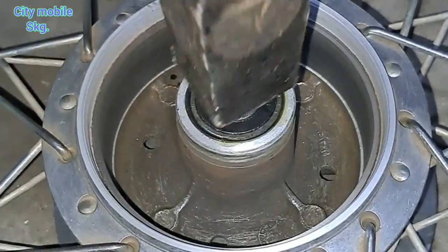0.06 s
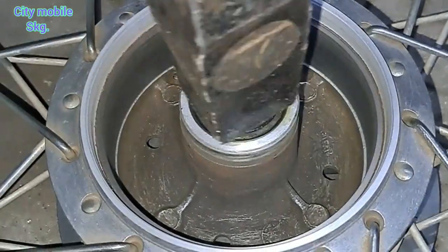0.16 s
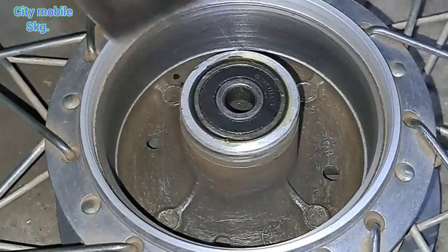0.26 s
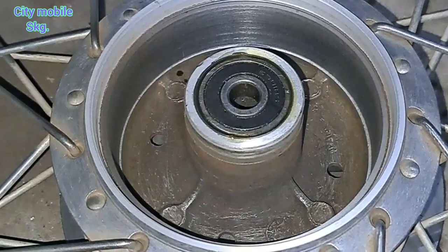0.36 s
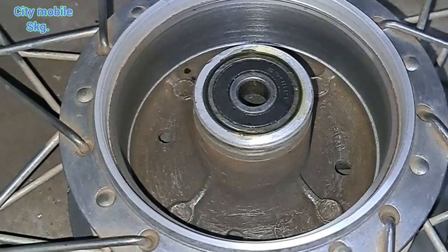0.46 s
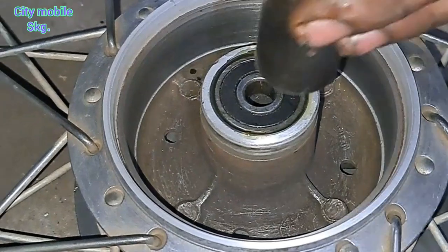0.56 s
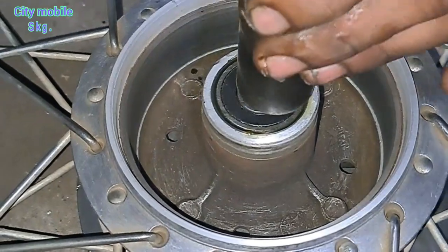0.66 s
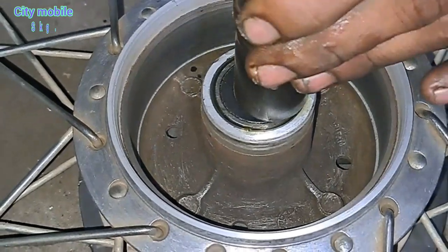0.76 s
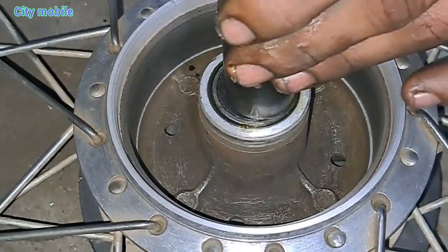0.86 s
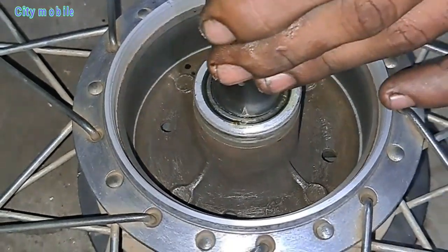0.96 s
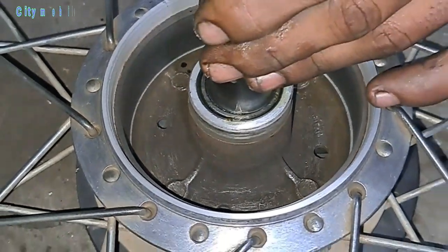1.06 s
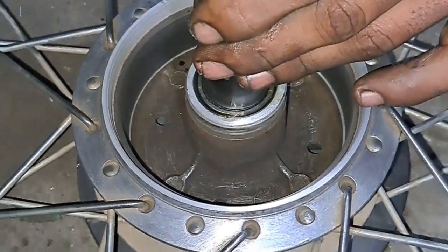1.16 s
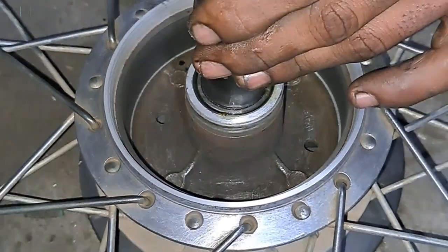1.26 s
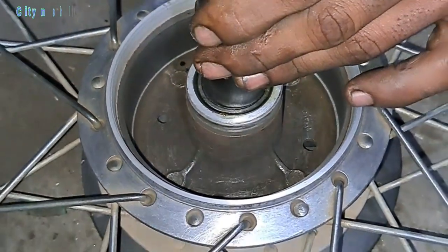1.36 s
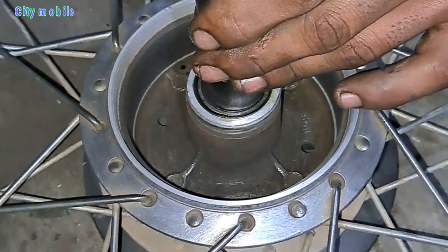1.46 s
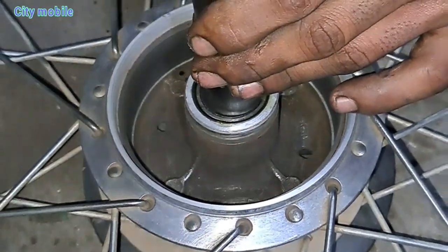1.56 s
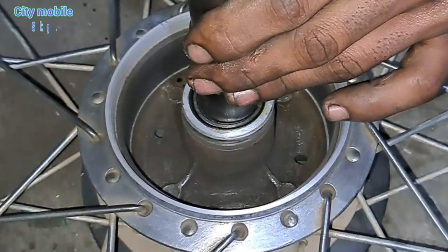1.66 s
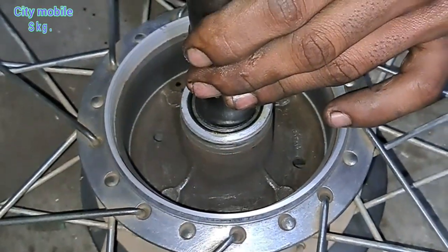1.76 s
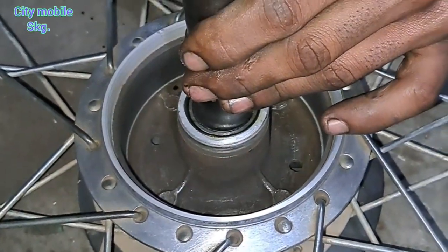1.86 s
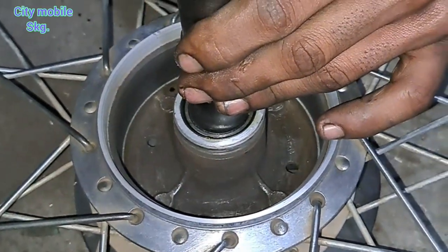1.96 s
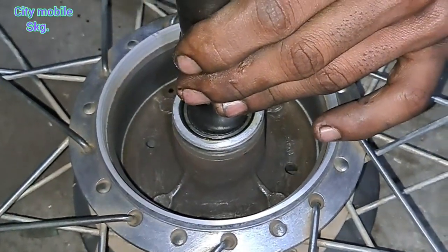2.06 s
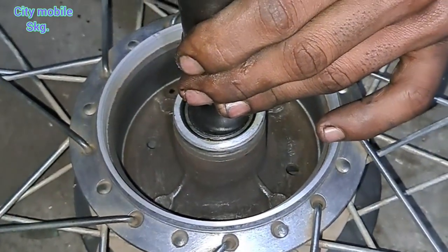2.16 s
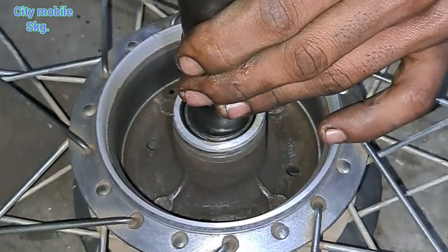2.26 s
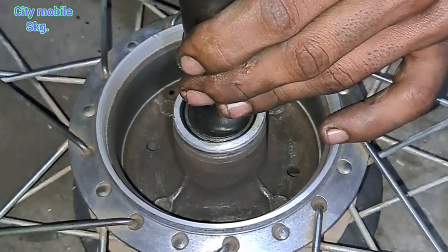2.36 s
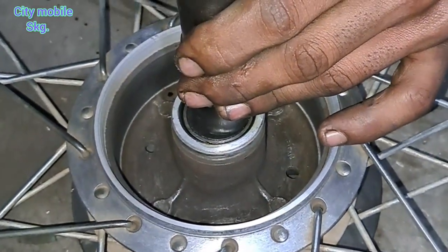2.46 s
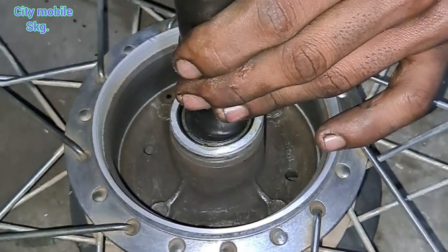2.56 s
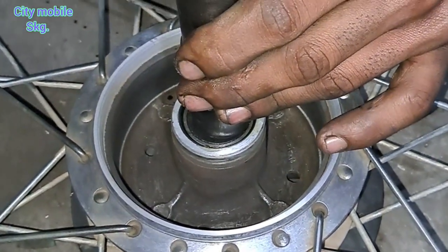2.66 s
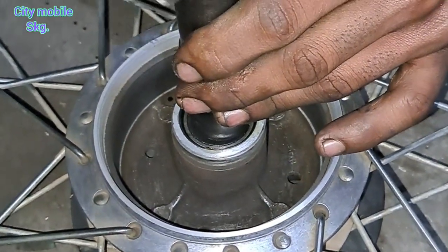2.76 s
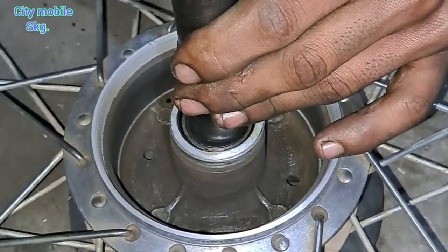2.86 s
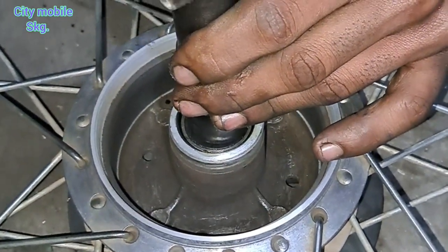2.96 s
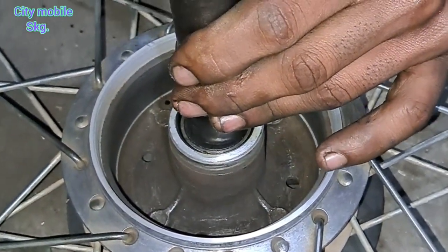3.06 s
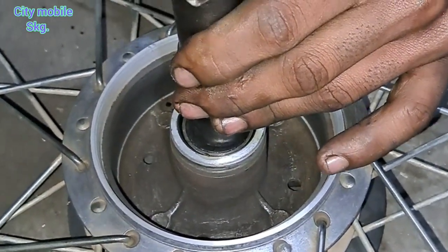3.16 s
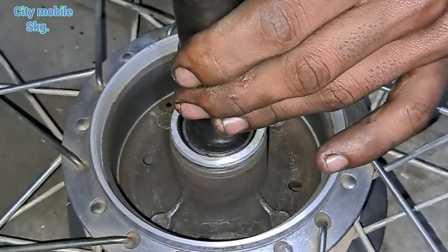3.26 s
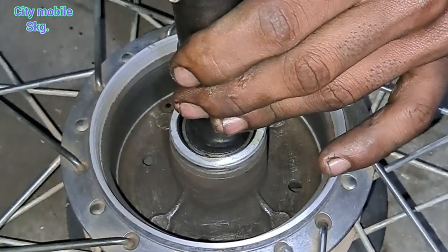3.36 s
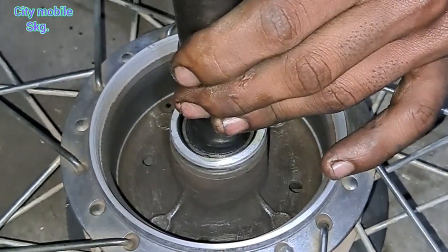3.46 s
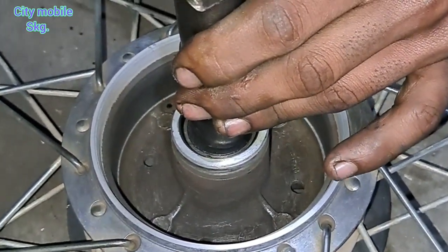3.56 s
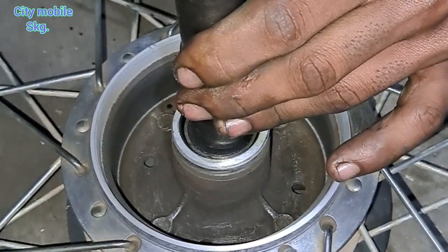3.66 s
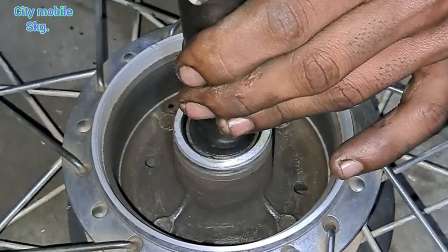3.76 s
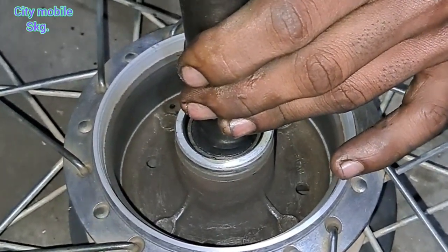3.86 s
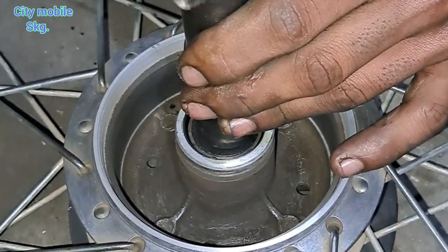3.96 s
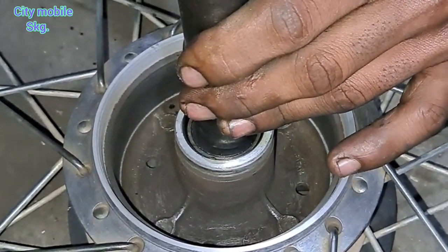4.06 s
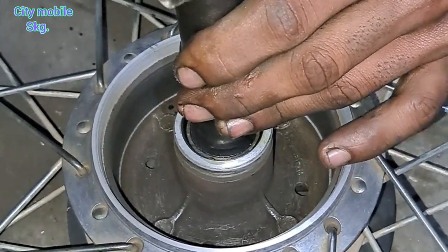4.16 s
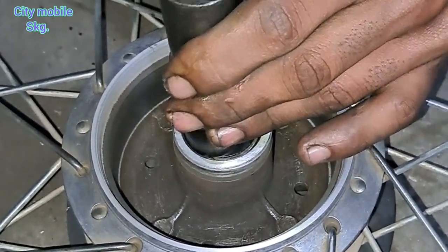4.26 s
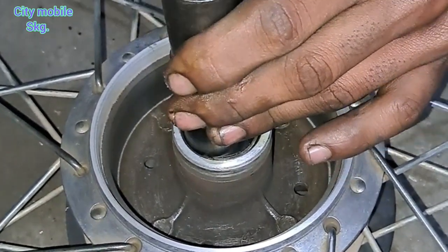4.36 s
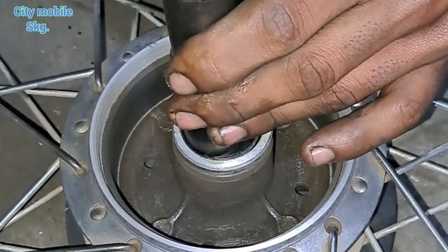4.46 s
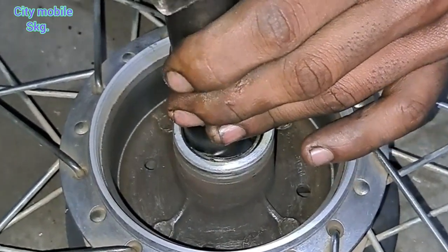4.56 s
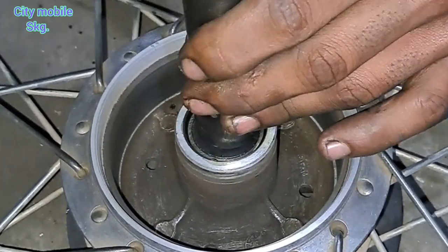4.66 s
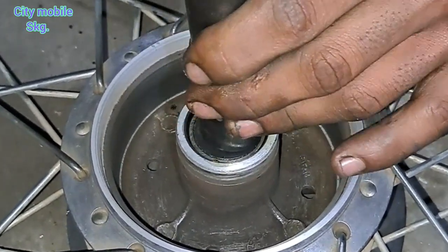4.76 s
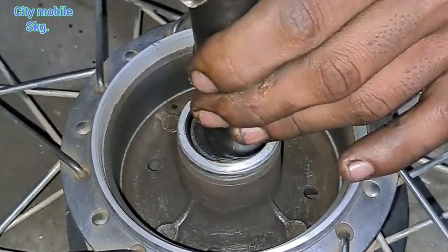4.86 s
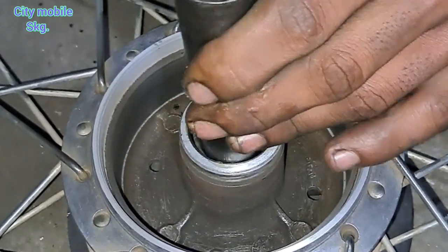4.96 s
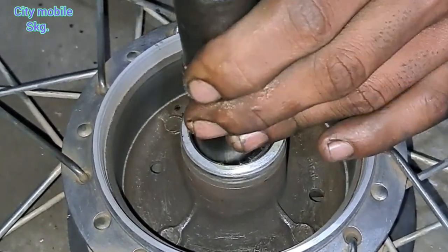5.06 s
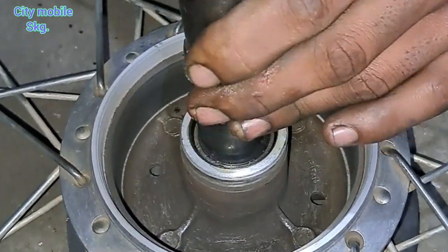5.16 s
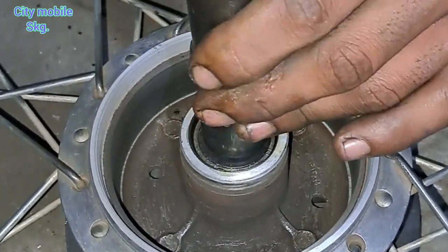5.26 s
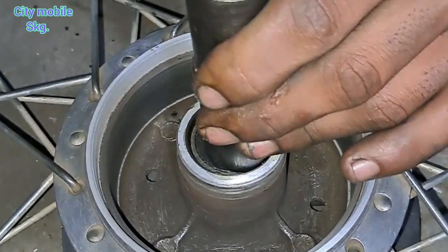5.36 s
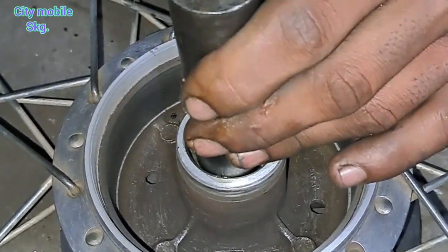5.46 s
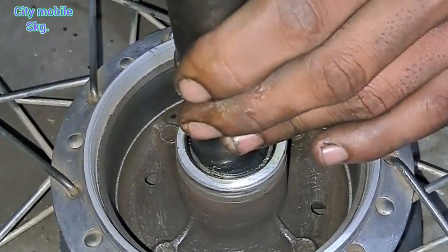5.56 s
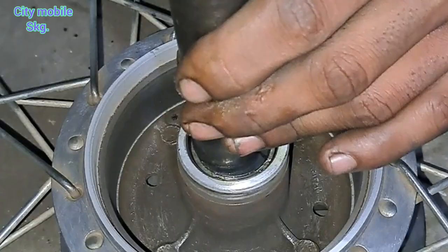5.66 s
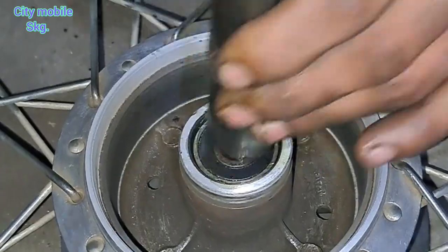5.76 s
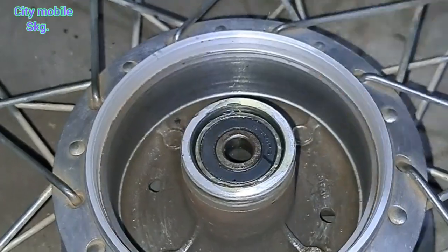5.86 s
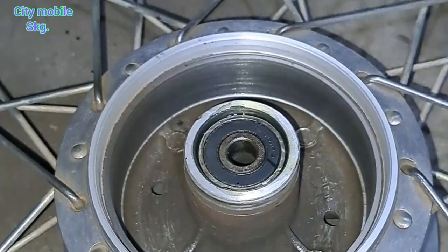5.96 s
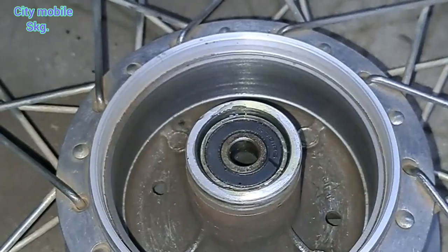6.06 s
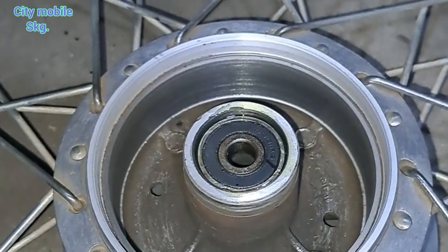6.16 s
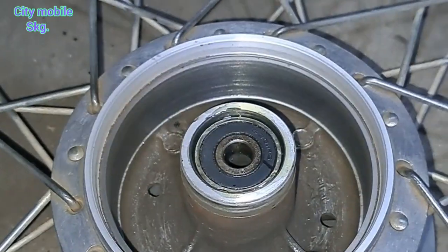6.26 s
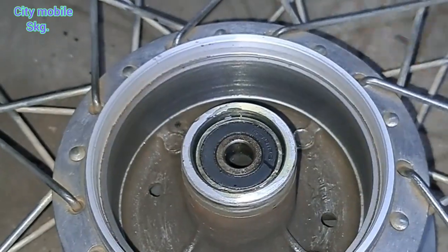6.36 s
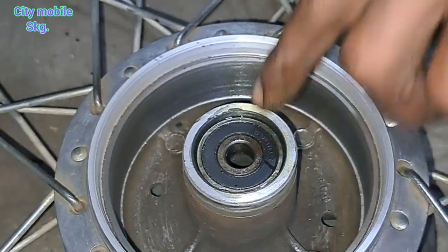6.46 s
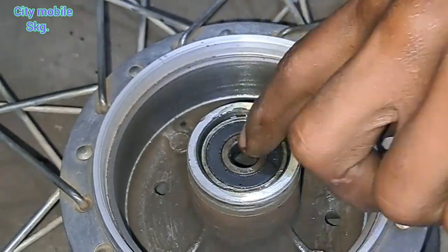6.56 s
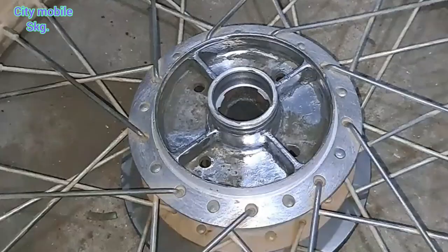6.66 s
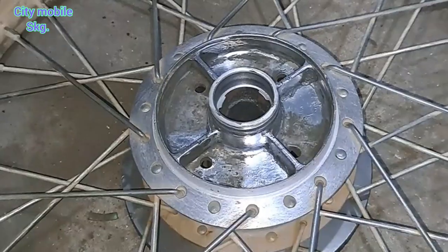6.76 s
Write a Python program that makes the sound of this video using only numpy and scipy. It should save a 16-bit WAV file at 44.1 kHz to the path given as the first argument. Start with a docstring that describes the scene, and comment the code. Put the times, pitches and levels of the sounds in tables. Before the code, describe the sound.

Close stereo view of a hard workshop: two heavy, dull hammer blows, a pause with a light clink as a steel drift is set down, then a run of sharp, ringing metal cracks about five a second, slowing near the end. A few light tool knocks follow over street rumble and engine drone, which swells at the close.

```python
"""A steel hammer drives a bearing into a spoked wheel hub: two duller blows with more thud, then brighter ones.
Cracks are coloured noise bursts with echoes and a hard-walled workshop's tail; steel rings as decaying sines.
Lesser contacts crack close to some blows, a drift clinks, low bumps of air sound and tools knock lightly.
Behind: street rumble, engine drone, wash and hiss of shaped noise, a faint whine and one thin, distant squeal."""
import sys
import numpy as np
from scipy import signal
from scipy.fft import rfft, irfft
from scipy.io import wavfile
from scipy.ndimage import uniform_filter1d

SR = 44100
rng = np.random.default_rng(int(sys.argv[2]) if len(sys.argv) > 2 else 0)


def unload_audio(sound):
    """Save the sound as a 16-bit wav file, at the path given as the first command line argument."""
    columns = np.transpose(np.atleast_2d(sound))
    # keep every value between -1 and 1, then stretch to whole-number steps
    steps = np.round(np.clip(columns, -1, 1) * 32767)
    wavfile.write(sys.argv[1], SR, steps.astype(np.int16))


N = 299880
T = np.arange(int(.6 * SR)) / SR  # time axis of one short sound [s]


# hammer blows; crack, clatter and brightness are relative:
# (time [s], crack [dB], room clatter [dB], brightness [dB], hub ring [dB])
BLOWS = [(0.0095, 6.5, 0.5, -10, -27), (0.1482, 5.5, -2, -12.5, -27), (1.1054, 3.5, 5, -7, -26.5),
         (1.3003, -7.5, 4.5, -5, -32), (1.523, 5.5, 2, 1.5, -25.5), (1.725, 2.5, 4.5, -0.5, -32),
         (1.9381, 6, -0.5, 1, -27), (2.146, 4.5, -3, 3, -25), (2.3301, 2.5, 4.5, -1, -33),
         (2.5205, 4.5, 4.5, -.5, -28.5), (2.7307, 9, 1.5, 1.5, -32), (2.9133, 2.5, 5.5, 0.5, -27.5),
         (3.1356, -14, 3, -1.5, -37), (3.3393, 3, -1.5, 3, -26.5), (3.531, -2.5, 7, -4, -35.5),
         (3.7449, 4.5, 0, 1, -27), (3.936, 6.5, 3.5, 0, -30), (4.1158, 5.5, -0.5, 2.5, -24.5),
         (4.4949, 8.5, 7.5, -4, -27), (4.8205, 6, 5, -0.5, -34), (5.137, 2.5, 3, -0.5, -20.5),
         (5.4021, 5, 1.5, -4, -26), (5.5809, 3, -3, -5.5, -22), (5.6732, 3.5, -8, -6, -28.5)]
# extra contacts close to a blow, before or after it: (time [s], relative level [dB])
EXTRA_CONTACTS = [(1.1205, -30), (3.1288, -18), (3.1403, -12.5), (3.5443, -6.5), (3.9675, -21),
                  (4.5095, -5), (4.5219, -8.5), (4.846, -9)]
# modes of hub, wheel, drift, drift overtones and hammer head; levels relative within a part, t60 before grip:
# (frequency [Hz], level [dB], t60 [s], left minus right [dB])
HUB_MODES = [(2595, 0, .05, -10), (2645, 1, .035, -11), (2710, 0, .025, -11), (2800, -4, .025, -9)]
WHEEL_MODES = [(385, 0, .07, -2), (460, -5, .08, -2), (705, -18, .25, -1), (900, -6, .07, -1),
               (990, -4, .07, -1), (1147, -3, .07, -1), (1362, -3, .08, -3), (1750, -5, .06, -1),
               (1914, 1, .06, 0), (4370, -8, .05, -6), (4652, -5, .05, -5), (5043, -5, .06, -5)]
DRIFT_MODES = [(6138, 0, .22, -13), (6188, 0, .18, -16), (6165, 1, .09, -14)]
OVERTONE_MODES = [(10232, -2, .48, -5), (10322, 0, .55, -11), (10930, 5, .12, -5)]
HEAD_MODES = [(8730, -3, .05, 5), (8790, 1, .045, 8), (8900, -7, .04, 8), (9610, -10, .05, 7),
              (10090, -16, .1, 0), (14310, -9, .07, 1), (14630, -25, .12, 5), (14960, -26, .1, 0)]
# ring level against the blow: (base [dB], then slope per dB of crack, clatter, brightness [dB/dB])
DRIFT_LAW = (-29.5, -0.05, .5, .5)
OVERTONE_LAW = (-43, -0.3, 1.21, 1.3)
HEAD_LAW = (-39, -0.2, 1.75, 2.13)
# extra bass; a firmly seating blow clatters little and thuds more: (base [dB], then the same slopes [dB/dB])
THUD_LAW = (-5, 0, -0.45, -0.27)
WHEEL_DB = -37.5
EARLY_UNTIL_S, EARLY_THUD_DB = 1, 6  # earlier blows have more thud
GRIP_DB_PER_S = 26  # extra damping by the hand on the drift


def hammering():
    """Each blow cracks and excites the modes of hub, wheel, drift and hammer head."""
    out = np.zeros((2, N))
    grip = amp(-GRIP_DB_PER_S * T)
    for time_s, crack_db, room_db, bright_db, hub_db in BLOWS:
        blow_db = crack_db, room_db, bright_db
        thud_db = follow(THUD_LAW, *blow_db) + EARLY_THUD_DB * (time_s < EARLY_UNTIL_S)
        wheel_db = (crack_db + room_db) / 2 + WHEEL_DB
        drift_db = follow(DRIFT_LAW, *blow_db)
        overtone_db = follow(OVERTONE_LAW, *blow_db)
        head_db = follow(HEAD_LAW, *blow_db)
        sound = impact(crack_db, room_db, thud_db, bright_db)
        sound += ring(HUB_MODES, hub_db, wet_db=-8.5, vary_db=4, detune=.005)
        sound += ring(WHEEL_MODES, wheel_db, wet_db=-1, vary_db=5, detune=.0042)
        # slow rise: the drift's note swells after the crack
        sound += grip * ring(DRIFT_MODES, drift_db, wet_db=-7, vary_db=4, detune=.0007, rise_s=.03)
        sound += grip * ring(OVERTONE_MODES, overtone_db, wet_db=-2, vary_db=2.5, detune=.0001)
        sound += ring(HEAD_MODES, head_db, wet_db=-9, vary_db=1.5, detune=.0012)
        add(out, time_s - .0004, sound)
    for time_s, level_db in EXTRA_CONTACTS:
        add(out, time_s, impact(level_db, level_db - 8.0, thud_db=-1.5, bright_db=2.5))
    return out


# colour of the direct crack: (frequency [Hz], left [dB], right [dB])
CRACK_COLOUR = [(39.86, -3.5, -9.5), (162, 23, 1), (390, 19, 26.5), (640, 15.5, 7.5), (1190, 14, 2),
                (1800, 18, 17), (3670, 7, 10.5), (4800, 13, 15), (7260, 10, 16), (7300, 11.5, 5),
                (10800, 6, -5.5), (12080, -8.5, 18.5), (14000, 10, -5), (15900, -33, -4)]
# colour of the room's answer: (frequency [Hz], left [dB], right [dB])
ROOM_COLOUR = [(59.7, 16, 14.5), (430, 15, 16), (835, 1.5, 7.5), (1200, 5, 14), (2700, 11.5, 13.5),
               (3930, 1.5, 6), (4280, 7, 13.5), (6600, -0.5, 16), (7350, -0.5, 16), (8070, -9, 0.5),
               (9700, -12.5, -10.5), (10300, -12, -5), (12600, -14.5, 2), (14550, -8, -10),
               (16000, -12, -9)]
# near walls and floor, before room colour: (delay [s], level [dB])
ECHOES = [(.0075, -40.5), (0.0119, -18.5), (.025, -15.5)]


def impact(crack_db, room_db, thud_db, bright_db):
    """Direct contact noise plus its early echoes and diffuse tail, each with its own colour."""
    crack, answer = contact(), room_tail()
    for delay_s, echo_db in ECHOES:
        add(answer, delay_s, amp(echo_db) * crack)
    crack, answer = uneven(np.array([crack, answer]), depth_db=2.4)
    direct = amp(crack_db - 4.0) * colour(crack, CRACK_COLOUR, thud_db, bright_db)
    reflected = amp(room_db + 1.22) * colour(answer, ROOM_COLOUR, thud_db, bright_db)
    return direct + reflected


def contact(rise_s=0.00059, t60_s=0.019):
    """Steel chattering on steel: a noise burst of milliseconds with a partly flattened spectrum."""
    shape = (1 - np.exp(-(T / rise_s) ** 2)) * amp(-60 * T / t60_s)
    spectrum = rfft(noise_pair(mono_hz=1740) * shape)
    even = irfft(spectrum / (abs(spectrum) + 1e-12) ** .5, len(T))
    return unit(even * np.minimum(shape * 4, 1))


def uneven(x, depth_db, step_hz=260):
    """Where the hammer lands favours some bands and starves others: random minimum-phase filter."""
    hz = np.fft.rfftfreq(len(T), 1 / SR)
    heights = rng.standard_normal(256)
    db = depth_db * np.interp(hz / step_hz, np.arange(len(heights)), heights)
    both_sides_db = np.r_[db, db[-2:0:-1]]
    causal = np.exp(np.conj(signal.hilbert(np.log(amp(both_sides_db)))))
    return unit(irfft(rfft(x) * causal[:len(hz)], len(T)))


def ring(modes, level_db, wet_db, vary_db, detune, rise_s=0.002):
    """Decaying sines of one part, direct and through the room; pitch, level and phase vary per strike."""
    sound = np.zeros((2, len(T)))
    variations = rng.standard_normal((len(modes), 3))
    for (hz, db, t60_s, balance_db), (pitch, level, phase) in zip(modes, variations):
        wave = np.sin(2 * np.pi * hz * (1 + detune * pitch) * T + phase)
        sound += sides(balance_db) * wave * amp(db + vary_db * level - 60 * T / t60_s)
    sound *= 1 - np.exp(-T / rise_s)
    wet = signal.fftconvolve(sound, room_tail(), axes=1)[:, :len(T)]
    both = unit(sound) + amp(wet_db) * unit(wet)
    # level: mean power over 0.1 s
    return amp(level_db) * np.sqrt(SR / 10) * unit(both)


def room_tail(t60_s=0.26, bass_t60_s=0.35, build_s=0.0047):
    """Diffuse reflections build up and die away; the bass lasts longer."""
    noise = noise_pair(mono_hz=766)
    bass = signal.sosfiltfilt(signal.butter(2, 600, fs=SR, output="sos"), noise)
    tail = (noise - bass) * amp(-60 * T / t60_s) + 0.99 * bass * amp(-60 * T / bass_t60_s)
    return unit(tail * (1 - np.exp(-(T / build_s) ** 4)))


def follow(law, *driver_db):
    """A level linear in one or more driving levels."""
    return law[0] + np.dot(law[1:], driver_db)


# the drift is set down on the bearing: (time [s], relative level [dB])
SEATINGS = [(0.731, -9.5), (4.276, -19.5)]
# modes of the bearing under the drift, relative levels:
# (frequency [Hz], level [dB], t60 [s], left minus right [dB])
BEARING_MODES = [(435, 1, 0.029, -1), (1360, 5.5, 0.027, -3), (1915, -7, 0.062, 3), (2660, 4.5, 0.034, -11),
                 (4350, -18.5, 0.04, -6)]


def seatings(clink_db=-29):
    """The drift meets the bearing: a dull touch and short, dry modes."""
    out = np.zeros((2, N))
    for time_s, level_db in SEATINGS:
        clink = ring(BEARING_MODES, level_db + clink_db, wet_db=-14, vary_db=1, detune=.003)
        add(out, time_s, touch(level_db) + clink)
    return out


# light knocks of the tools: (time [s], relative level [dB], nominal pitch [Hz])
KNOCKS = [(6.1, -14, 558), (6.141, -20, 537), (6.173, -7.5, 723), (6.442, -14.5, 664)]


def knocks(t60_s=0.083, tone_db=-35):
    """Tools put down: light, dull touches, each with one short decaying note."""
    out = np.zeros((2, N))
    for time_s, level_db, hz in KNOCKS:
        note = ring([(hz, 0, t60_s, 0)], level_db + tone_db, wet_db=0, vary_db=0, detune=.004)
        add(out, time_s, note + touch(level_db))
    return out


# colour of a light knock: (frequency [Hz], left [dB], right [dB])
DULL_COLOUR = [(102, 11.5, 17.5), (450, 17.5, 18), (750, 9.5, 15), (1176, 11.5, 12.5), (2000, 7.5, 11.5),
               (3060, -6.5, -11), (5330, -14.5, -10), (14750, -21, -14.5)]


def touch(level_db, room=0.74, bright_db=-1.5):
    """A light, dull contact and the room's answer: one filtered noise burst and tail."""
    return amp(level_db) * colour(contact() + room * room_tail(), DULL_COLOUR, 0, bright_db)


# air pushed by the swing, catching the left microphone: (time [s], level before balance [dB])
PUFFS = [(1.31, -29), (2.519, -21.5), (4.499, -45), (5.405, -23)]


def puffs(hz=48, t60_s=0.17):
    """A soft, low bump of air: a decaying sine, mostly left."""
    out = np.zeros((2, N))
    for time_s, level_db in PUFFS:
        add(out, time_s, sides(12) * np.sin(2 * np.pi * hz * T) * amp(level_db - 60 * T / t60_s))
    return out


def squeal(hz=3058, level_db=-48, peak_s=6.47, width_s=0.042, waver=.001, flutter_db=5.5):
    """A thin, distant squeal: one sine swells and fades, pitch and level wandering together."""
    t = np.arange(N) / SR
    wander = np.sqrt(N) * unit(uniform_filter1d(rng.standard_normal(N), size=1500))
    tone = np.sin(2 * np.pi * np.cumsum(hz * (1 + waver * wander)) / SR)
    return sides(-11) * tone * amp(level_db + flutter_db * wander) / np.cosh((t - peak_s) / width_s)


# relative level of the background: (time [s], level [dB])
BACKGROUND = [(0, 4.5), (0.601, -1.5), (.85, 5), (1, 8.5), (1.5, -2.5), (2.5, 0), (3.3, 0), (4.4, -7),
              (5.1, -2.5), (5.85, -6), (6.0, 2), (6.33, 1.5), (6.8, 15.5)]
# relative spectra of the street's layers: (frequency [Hz], level [dB])
RUMBLE_SPECTRUM = [(20, -34.5), (45, -23.5), (70, -8.5), (84, 0), (105, -7), (138, 1.5), (180, -7.5),
                   (260, -16.5), (400, -20.5), (700, -42.5), (2000, -78)]
ENGINE_SPECTRUM = [(20, -28), (55, -16.5), (78, 2), (95, -8), (130, -35.5), (400, -68)]
WASH_SPECTRUM = [(100, 14), (350, 7.5), (600, 11), (950, 7), (1170, 4), (1400, 3), (2300, 0.5), (3200, -10),
                 (8000, -38.5)]
WHINE_SPECTRUM = [(900, -51), (1110, -22), (1165, 1), (1220, -4), (1500, -55)]
HISS_SPECTRUM = [(1000, 5.5), (3000, -3), (5000, 3), (6700, 9), (7600, 5), (8600, -14), (10500, -15),
                 (12300, 0.5), (15000, -20), (16500, -13.5)]
# layer level against the background curve: (level at 0 dB on the curve [dB], slope [dB/dB])
RUMBLE_LAW = (-42, .85)
WASH_LAW = (-55, 1.1)
HISS_LAW = (-63, 0.85)
ENGINE_LAW = (-50.5, 1.5)


def street():
    """Rumble, drone, wash and hiss follow one level curve; a faint whine does not."""
    curve_db = np.interp(np.arange(N) / SR, *np.transpose(BACKGROUND))
    rumble_db = follow(RUMBLE_LAW, curve_db)
    wash_db = follow(WASH_LAW, curve_db)
    hiss_db = follow(HISS_LAW, curve_db)
    engine_db = follow(ENGINE_LAW, curve_db)
    rumble = steady(RUMBLE_SPECTRUM, rumble_db, alike=0.96, balance_db=-3.0, swell_db=1.5)
    engine = steady(ENGINE_SPECTRUM, engine_db, alike=1.0, balance_db=3.5, swell_db=-2.0)
    wash = steady(WASH_SPECTRUM, wash_db, alike=0.15, balance_db=-3.5, swell_db=3.9)
    whine = steady(WHINE_SPECTRUM, -65, alike=.3, balance_db=-3, swell_db=2)
    hiss = steady(HISS_SPECTRUM, hiss_db, alike=.1, balance_db=-10, swell_db=1)
    return rumble + engine + wash + whine + hiss


def steady(spectrum, level_db, alike, balance_db, swell_db, swell_hz=9):
    """Coloured noise, partly shared by both channels, follows a level and swells at random."""
    hz = np.fft.rfftfreq(N, 1 / SR)
    left, right, shared, slow = rfft(rng.standard_normal((4, N)))
    pair = np.sqrt(1 - alike) * np.array([left, right]) + np.sqrt(alike) * shared
    swell = np.sqrt(N) * unit(irfft(slow * (hz < swell_hz), N))
    noise = np.sqrt(N) * unit(irfft(pair * amp(read(spectrum, hz)), N))
    return noise * sides(balance_db) * amp(level_db + swell_db * swell)


def noise_pair(mono_hz):
    """White noise at two microphones, alike in the bass."""
    a, b = rfft(rng.standard_normal((2, len(T))))
    same = 1 / (1 + (np.fft.rfftfreq(len(T), 1 / SR) / mono_hz) ** 2)
    return irfft(np.array([a, same * a + np.sqrt(1 - same ** 2) * b]), len(T))


def colour(x, table, thud_db, bright_db, size=4096):
    """Minimum-phase filter for each channel, with a bass and a treble shelf."""
    hz = np.abs(np.fft.fftfreq(size, 1 / SR))
    db = np.array([read(table, hz, axis=1), read(table, hz, axis=2)])
    bass_shelf = 1 / (1 + (hz / 700) ** 4)
    treble_shelf = 1 - 1 / (1 + (hz / 3300) ** 4)
    db = db + thud_db * bass_shelf + bright_db * treble_shelf
    taps = np.fft.ifft(np.exp(np.conj(signal.hilbert(np.log(amp(db)))))).real
    return signal.fftconvolve(x, taps, axes=1)[:, :len(T)]


def read(points, hz, axis=1):
    """One column of a spectrum, interpolated on a log-frequency axis."""
    table = np.transpose(points)
    return np.interp(np.log(hz + 1), np.log(table[0]), table[axis])


def amp(db):
    """Decibels to gain."""
    return 10 ** (np.asarray(db) / 20)


def unit(x):
    """Scales to a mean energy of one per channel."""
    return x / np.sqrt(np.mean(np.sum(x ** 2, axis=-1)) + 1e-20)


def sides(balance_db):
    """Left and right gains of mean power one."""
    return np.sqrt(2) * unit(amp([balance_db, 0]))[:, None]


def add(mix, time_s, sound):
    """Mixes a sound in, in place, at a time."""
    part = mix[:, max(round(time_s * SR), 0):][:, :sound.shape[1]]
    part += sound[:, :part.shape[1]]


def scene():
    """Hammering and tools in front of the street's noise."""
    return hammering() + seatings() + knocks() + puffs() + street() + squeal()


EDGE_HZ = 16000


def record(dry):
    """Microphones shed the lowest bass, the loudest peaks clip, then a lowpass limits the band."""
    lean = signal.sosfilt(signal.butter(2, 36, "highpass", fs=SR, output="sos"), dry)
    lowpass = signal.firwin(127, EDGE_HZ, window=("kaiser", 9), fs=SR)
    return signal.oaconvolve(np.clip(lean, -1, 1), lowpass[None], "same")


dry = scene()
out = record(dry)
unload_audio(out)
```